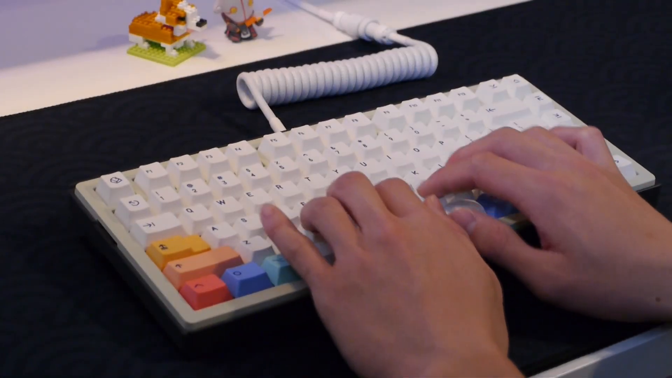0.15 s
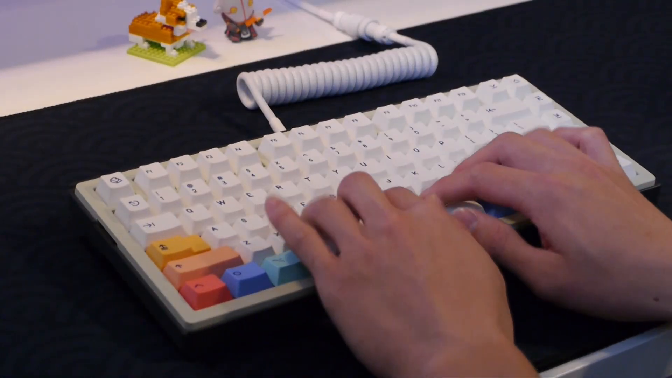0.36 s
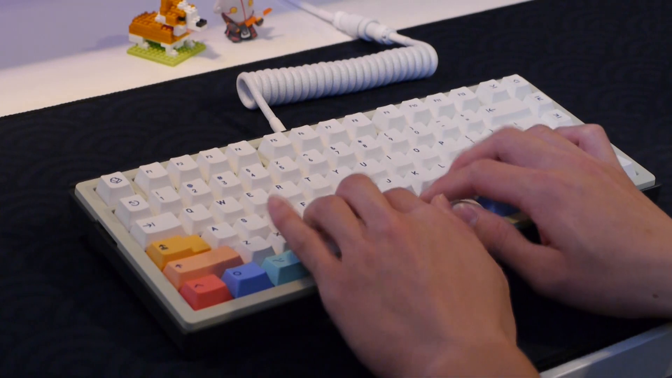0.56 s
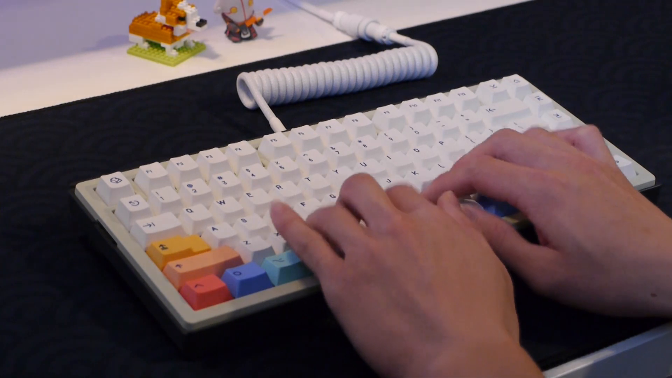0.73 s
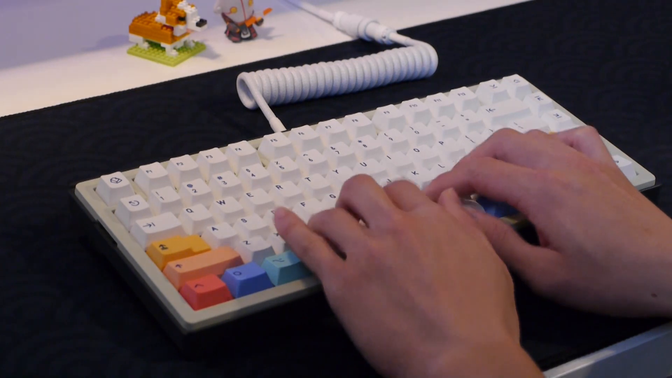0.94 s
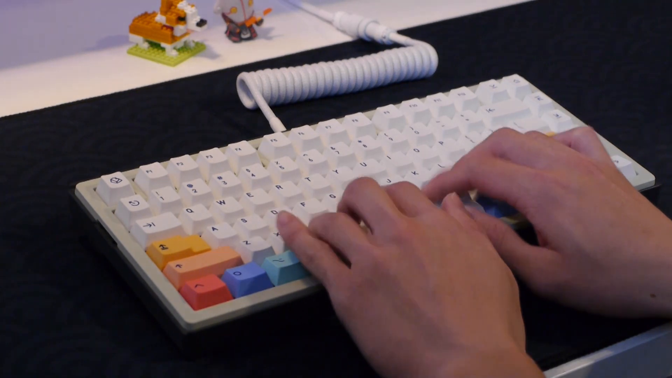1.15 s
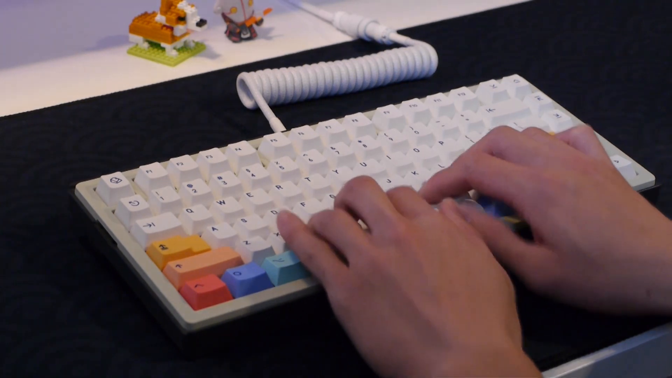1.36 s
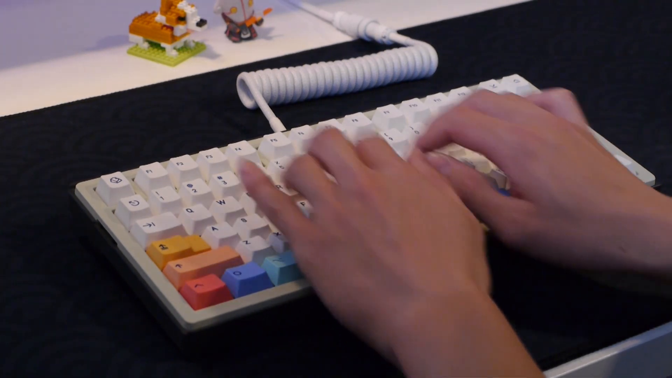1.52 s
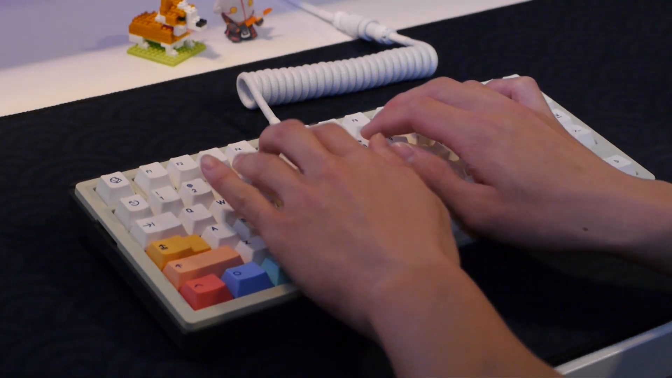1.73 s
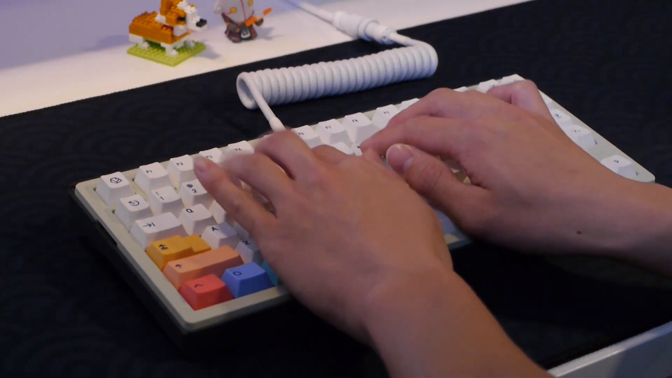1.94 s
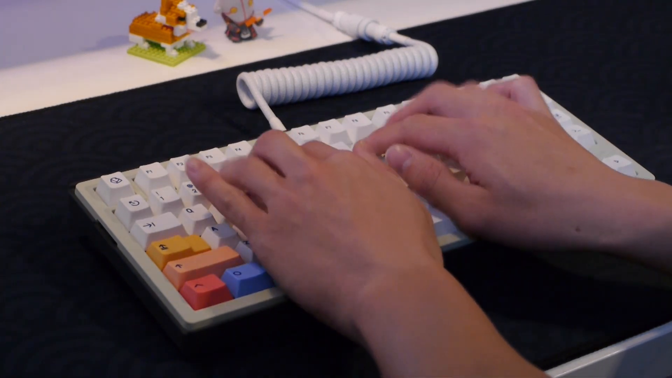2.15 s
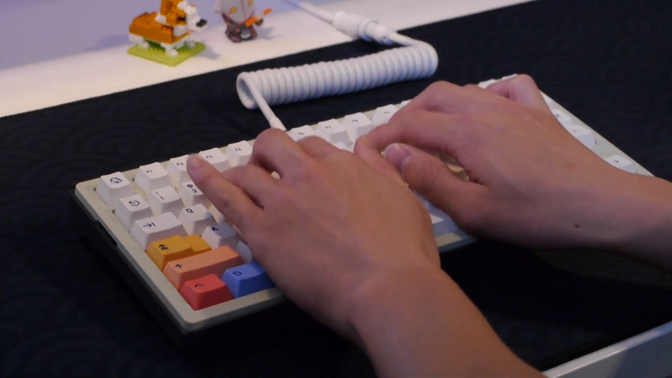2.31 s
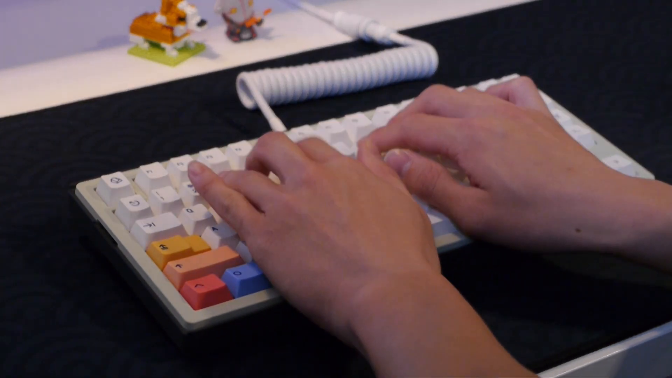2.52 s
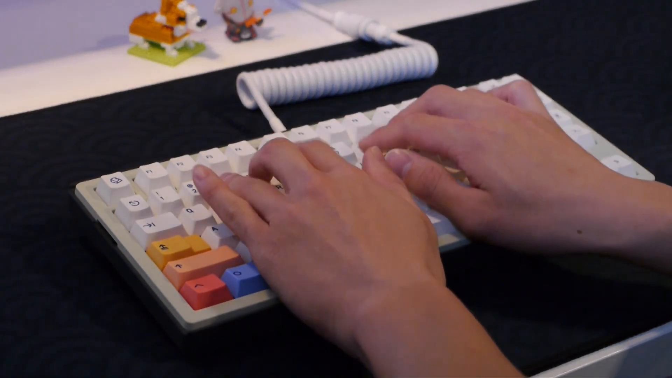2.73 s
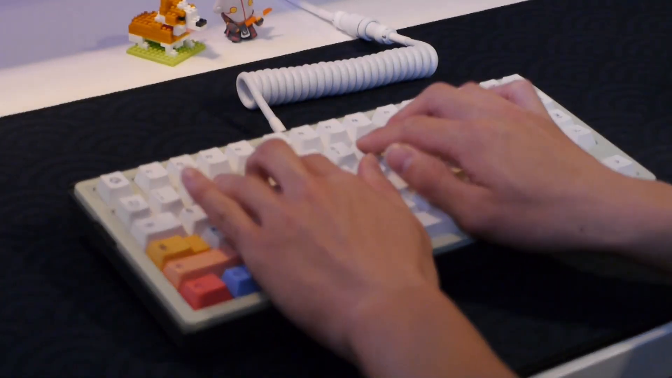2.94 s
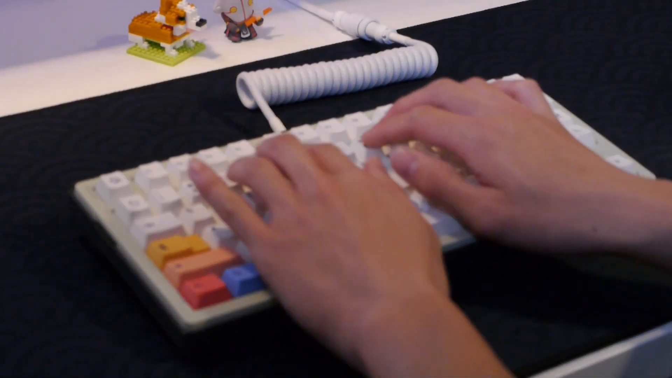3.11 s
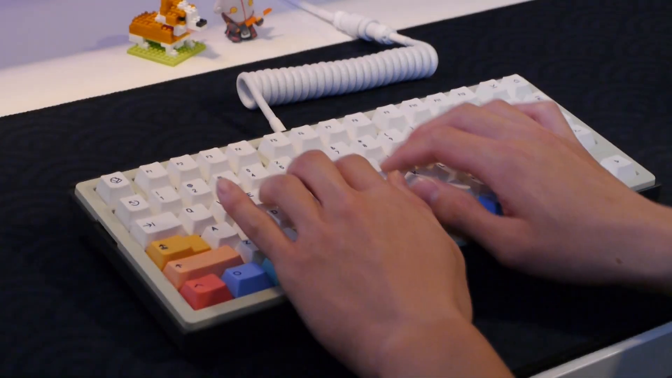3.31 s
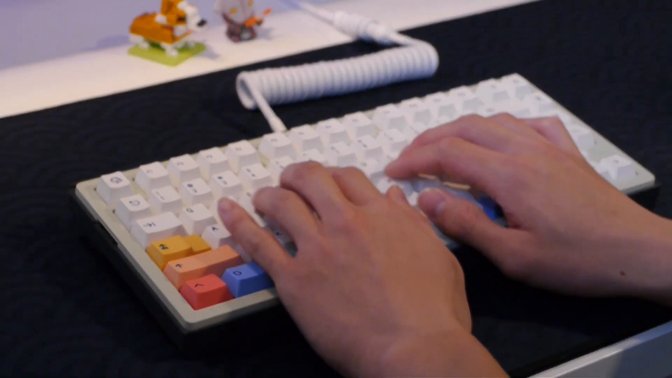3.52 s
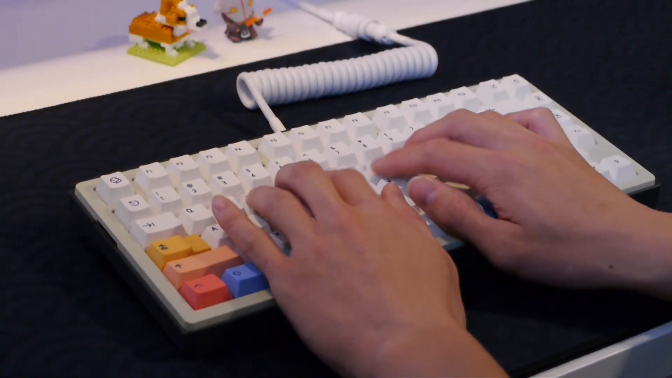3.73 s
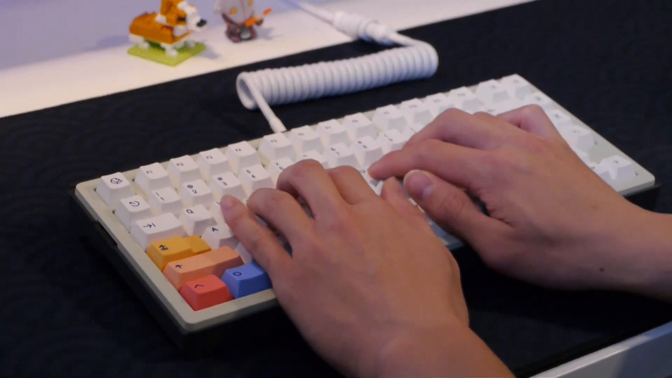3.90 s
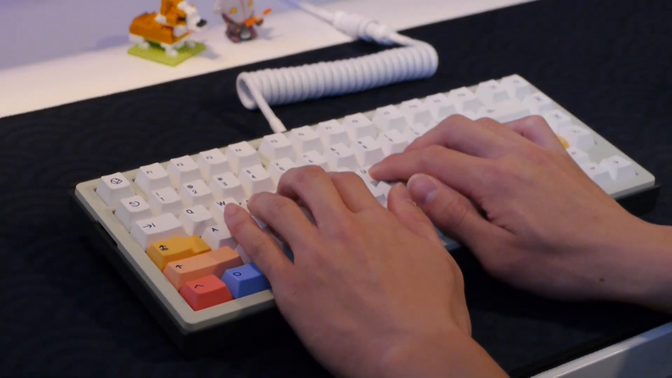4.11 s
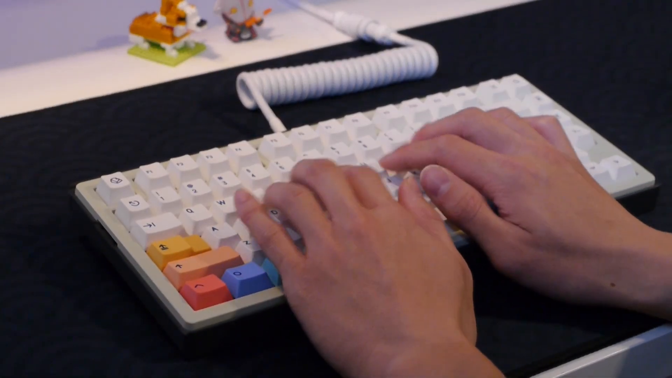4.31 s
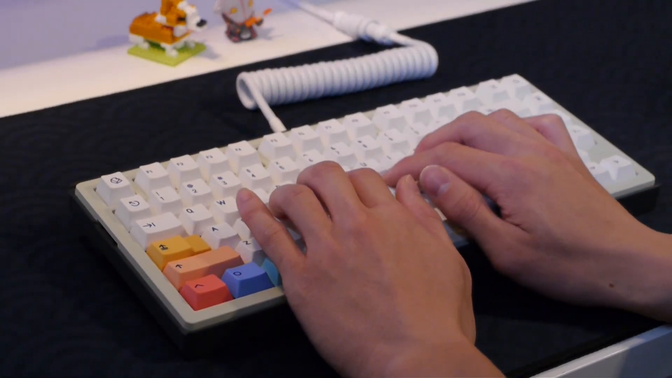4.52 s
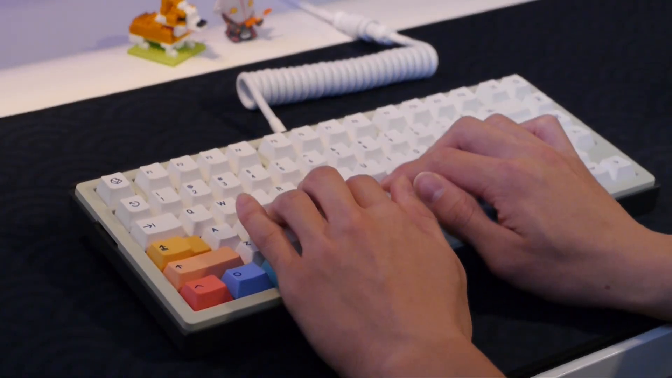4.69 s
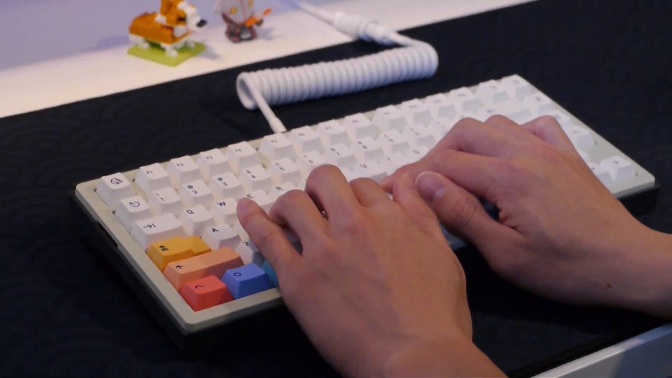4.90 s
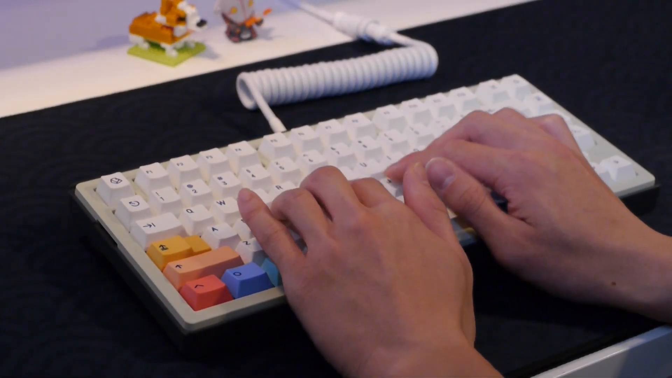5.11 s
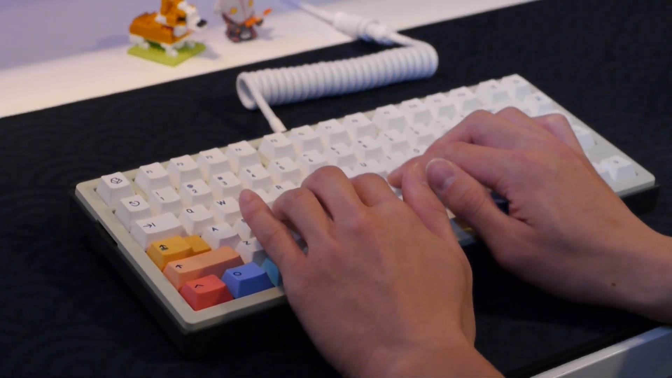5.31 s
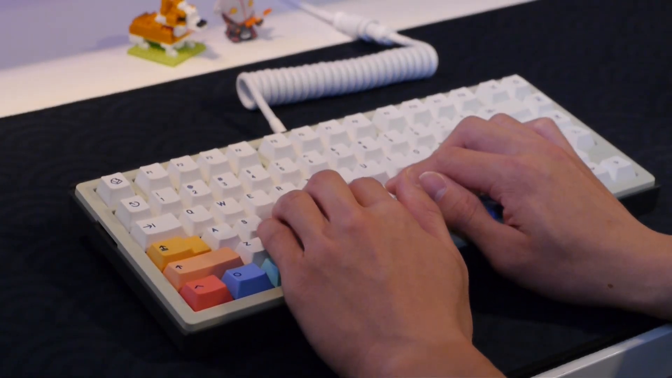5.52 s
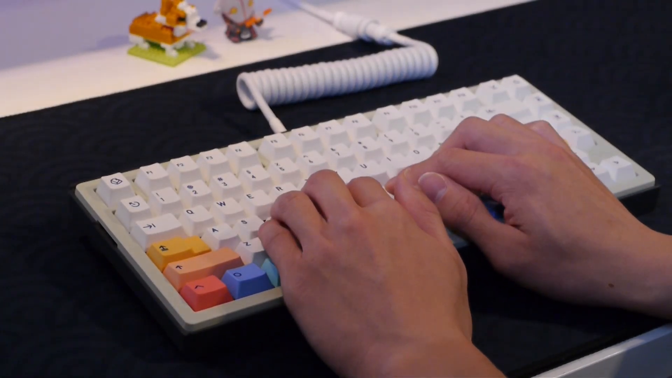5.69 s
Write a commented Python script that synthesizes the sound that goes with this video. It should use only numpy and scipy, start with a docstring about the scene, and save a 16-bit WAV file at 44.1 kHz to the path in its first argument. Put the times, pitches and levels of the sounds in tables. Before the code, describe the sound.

Close, cushioned plastic clacks come from a mechanical keyboard: a quick run of typing, a short break, another slightly stronger run, then five spaced key presses. Each key knocks and ticks lightly as it lands or springs back, with a short small-room tail. Fingertips faintly brush the keycaps, and a fan hums quietly throughout. The stereo microphone is at the desk, with the keyboard a little to its left.

```python
"""Typing at a desk in a small room

Two fast runs on a damped mechanical keyboard, a little left of the stereo microphone, then five slow
presses. Each key landing or springing back gives a short plastic knock and a faint tick, and rings
the case. The desk and nearby surfaces throw it back within about 6 ms, ahead of a short room tail.
Fingertips brush the keycaps; fan noise and a low hum lie underneath."""
import sys
import numpy as np
from scipy import signal
from scipy.fft import rfft, irfft
from scipy.io import wavfile
from scipy.ndimage import uniform_filter1d

SR = 44100
rng = np.random.default_rng(int(sys.argv[2]) if len(sys.argv) > 2 else 0)


def file_out(sig):
    """Save sig as 16-bit WAV at sys.argv[1]."""
    # one column per channel
    cols = np.atleast_2d(sig).T
    # limit, then scale
    lim = np.clip(cols, -1, 1)
    pcm = np.round(lim * 32767).astype(np.int16)
    wavfile.write(sys.argv[1], SR, pcm)


N = 253575
IMPACT_SAMPLES, ATTACK_SAMPLES = 4096, 360  # one impact, and its first 8 ms


def gain_of(db):
    """Decibels to an amplitude factor."""
    return 10 ** (np.asarray(db) / 20)


def unit(x):
    """Scales each channel to an energy of one."""
    return x / np.sqrt(np.sum(x ** 2, -1, keepdims=True) + 1e-20)


def curve(points, hz):
    """Reads a table along a logarithmic frequency axis."""
    table_hz, value = np.transpose(points)
    return np.interp(np.log(hz + 1), np.log(table_hz + 1), value)


def pan(left_db):
    """Channel gains for a source left_db louder on the microphone's left side."""
    return gain_of(np.array([[.5], [-.5]]) * left_db)


# Fan and room air at the desk: (frequency [Hz], relative density [dB])
AIR_SPECTRUM = [(25, -31), (48, -27), (62, -10.5), (105, -9), (130, -1.5), (185, 0.5), (250, -2), (400, -1),
                (840, -3), (1000, -7), (2200, -16), (4000, -21.5), (10000, -22), (13000, -27), (16000, -33)]
# How alike that air is on the microphone's two sides: (frequency [Hz], correlation [0-1])
AIR_CORRELATION = [(60, 0.83), (170, 0.99), (350, 0.81), (700, 0.37), (1500, 0.077), (4000, 0.043),
                   (12000, 0.051)]
# The fan's motor tones: (frequency [Hz], level [dB])
MOTOR_TONES = [(70, -72), (204.6, -71.5), (473.7, -79.5), (651.4, -67.5), (748.3, -68)]

def fan(air_db):
    """Steady air noise, nearly mono in the bass, with faint wavering motor tones."""
    hz, t = np.fft.rfftfreq(N, 1 / SR), np.arange(N) / SR
    left, other = rfft(rng.standard_normal((2, N)))
    correlation = curve(AIR_CORRELATION, hz)
    right = correlation * left + np.sqrt(1 - correlation ** 2) * other
    air = irfft(np.array([left, right]) * gain_of(curve(AIR_SPECTRUM, hz)), N)
    out = gain_of(air_db) * unit(air) * np.sqrt(N)
    knots = np.linspace(0, t[-1], num=24)
    for tone_hz, db in MOTOR_TONES:
        waver = np.interp(t, knots, 0.25 * rng.standard_normal(len(knots)))
        phase = 2 * np.pi * (tone_hz * t + rng.random()) + waver
        out += np.sqrt(2) * gain_of(db) * np.sin(phase)
    return out * pan(left_db=0.39)


# The small room around the desk: (frequency [Hz], time to fall 60 dB [s])
ROOM_DECAY = [(150, 0.6), (600, 0.49), (1500, 0.29), (3000, 0.23), (9000, 0.3), (15000, 0.12)]

def room(source, correlation, build_s):
    """A short diffuse room tail whose colour drifts, cycling through three tails once a second."""
    t, out = np.arange(SR // 2) / SR, np.zeros((2, N))
    onset = np.clip(t / build_s - .5, 0, 1)
    for k in range(3):
        noise = rng.standard_normal((3, len(t)))
        stereo = np.sqrt(correlation) * noise[2] + np.sqrt(1 - correlation) * noise[:2]
        hz, frame_s, bands = signal.stft(stereo, SR, nperseg=256)
        decay = gain_of(-60 * frame_s / curve(ROOM_DECAY, hz)[:, None])
        tail = signal.istft(bands * decay, SR, nperseg=256)[1][:, :len(t)]
        crossfade = np.cos(2 * np.pi * (np.arange(N) / SR + k / 3)) * np.sqrt(2 / 3)
        out += signal.fftconvolve(source * crossfade, unit(tail * onset), axes=1)[:, :N]
    return out


# Skin brushing plastic: (frequency [Hz], relative density [dB])
SKIN_SPECTRUM = [(700, -16), (1500, -0.5), (2400, -0.5), (3800, -16), (5500, -6.5), (8500, -10.5),
                 (13000, -30), (16000, -24)]
# First the faint fading tail of a key struck just before the start, then fingertip slides:
# (middle time [s], length [s], level [dB])
FAINT_SWELLS = [(0.028, 0.22, -60), (.85, 1.9, -66), (3.57, 0.73, -64), (3.887, .05, -63),
                (4.1, 0.34, -63.5), (5.08, 0.2, -65), (5.55, .2, -64.5)]

def fingertips(grain_db, resting_db):
    """Skin sticks and slips on the keycaps in faint swells; the same noise gives the opening key tail."""
    hz, t = np.fft.rfftfreq(N, 1 / SR), np.arange(N) / SR
    grip = unit(uniform_filter1d(rng.standard_normal(N), size=500)) * np.sqrt(N)
    slips = (rng.standard_normal(N) + rng.standard_normal((2, N))) * gain_of(grain_db * grip)
    brush = unit(irfft(rfft(slips) * gain_of(curve(SKIN_SPECTRUM, hz)), N)) * np.sqrt(N)
    power = gain_of(resting_db) ** 2  # fingers shifting where they rest
    for middle_s, length_s, db in FAINT_SWELLS:
        swell = np.cos(np.pi * np.clip((t - middle_s) / length_s, -.5, .5))
        power += (gain_of(db) * swell) ** 2
    return brush * np.sqrt(power)


# Desk and nearby surfaces: (delay [ms], knock left [gain], knock right [gain], tick [gain])
DESK_ECHOES = [(1.13, .37, .14, .6), (2.52, .22, .08, .16), (3.85, .11, .06, .12), (4.95, .4, .3, 1.2),
               (5.37, .33, .12, .72)]

def desk_paths(direct_db, gain_columns, spread_ms):
    """The straight path to the microphone and early echoes, whose delays shift with the key's place."""
    echoes = np.transpose(DESK_ECHOES)
    shift = rng.standard_normal() + .5 * rng.standard_normal(len(DESK_ECHOES))
    delay_ms = echoes[0] + spread_ms * shift
    taps = np.zeros((2, IMPACT_SAMPLES))
    taps[:, 0] = gain_of(direct_db)
    taps[:, np.round(delay_ms * SR / 1000).astype(int)] += echoes[gain_columns]
    return taps


def rattle(t60, correlation):
    """A dying spray of tiny contacts and scatter among the keycaps, partly alike in both channels."""
    t = np.arange(IMPACT_SAMPLES) / SR
    shared, apart = rng.standard_normal(len(t)), rng.standard_normal((2, len(t)))
    noise = np.sqrt(correlation) * shared + np.sqrt(1 - correlation) * apart
    return unit(noise * gain_of(-60 * t / t60) * np.clip(t / 0.0018, 0, 1))


# Modes of plate and case: (frequency [Hz], relative level [dB], time to fall 60 dB [s])
CASE_MODES = [(807, 3.5, 0.065), (942, 12.5, 0.26), (1165, 15, 0.11), (1555, 38.5, 0.029),
              (1828, -27, 0.14), (1890, -12, 0.085), (2240, 0, 0.12), (2450, 12, 0.26), (3046, 4, .055)]

def case_ring(detune, uneven_db):
    """Plate and case ring on; each key drives their modes with its own strengths."""
    hz, db, t60 = np.transpose(CASE_MODES)[:, :, None]
    t = np.arange(IMPACT_SAMPLES) / SR
    shift, strength = rng.standard_normal((2, len(CASE_MODES), 1))
    envelopes = gain_of(db + uneven_db * strength - 60 * t / t60)
    modes = envelopes * np.cos(2 * np.pi * hz * (1 + detune * shift) * t)
    return unit(modes.sum(0))


def pulse(parts, peak_hz=2000, peak_db=0, half_width_hz=100):
    """The shortest causal pulse that holds the (spectrum, dB) parts, with one optional resonance."""
    hz = abs(np.fft.fftfreq(IMPACT_SAMPLES, 1 / SR))
    extra_power = gain_of(max(peak_db, 0)) ** 2 - 1
    resonance = np.sqrt(1 + extra_power / (1 + ((hz - peak_hz) / half_width_hz) ** 2))
    power = sum((gain_of(db) * unit(resonance * gain_of(curve(shape, hz)))) ** 2 for shape, db in parts)
    log_gain = np.log(power * IMPACT_SAMPLES * ATTACK_SAMPLES + 1e-14) / 2
    minimum_phase = np.exp(np.conj(signal.hilbert(log_gain)))
    return np.fft.ifft(minimum_phase).real[None, :IMPACT_SAMPLES // 2]


def attack_level(sound, db):
    """Gives the first 8 ms of each channel the level db."""
    return sound * gain_of(db) / np.sqrt(np.mean(sound[:, :ATTACK_SAMPLES] ** 2, axis=1, keepdims=True))


# The keycap's thin tick: (frequency [Hz], relative density [dB])
TICK_SPECTRUM = [(1500, -66), (3300, 11.5), (4700, 4), (6300, 5), (9000, 9), (10300, 5.5), (11800, 8),
                 (13500, -1.5), (16000, -46)]

def tick(tick_db, ping_hz):
    """The keycap snaps with a brief chatter, thrown back strongly by the surfaces nearby."""
    parts = [(TICK_SPECTRUM, 0)]
    snap = gain_of(4) * rattle(t60=.0045, correlation=.4)
    snap[:, 0] += 1
    paths = desk_paths(direct_db=0, gain_columns=3, spread_ms=.04)
    early = unit(signal.fftconvolve(paths, snap, axes=1)[:, :IMPACT_SAMPLES])
    late = gain_of(-3) * rattle(t60=.12, correlation=.3)
    ping = pulse(parts, ping_hz, peak_db=6, half_width_hz=500)
    sound = signal.fftconvolve(early, ping, axes=1) + signal.fftconvolve(late, pulse(parts), axes=1)
    return attack_level(sound, tick_db)


# The soft, low part of a knock and its hard part: (frequency [Hz], relative density [dB])
THOCK_SPECTRUM = [(30, -45), (110, -29), (250, -11.5), (500, -4.5), (690, -3.5), (750, -1.5), (1250, 1.5),
                  (1500, -7), (2200, -13), (4000, -60)]
CLACK_SPECTRUM = [(500, -49), (1100, -4), (1550, 0), (2100, 6), (2800, 4), (3250, -2), (3900, -13),
                  (6000, -14), (12000, -28)]

def knock(strength_db, depth_db, cap_hz, cap_db, direct_db):
    """The stem hits its housing: one plastic pulse with its echoes, then rattle and the case's ring."""
    clack_db = strength_db - 10 * np.log10(1 + gain_of(depth_db) ** 2)  # the two parts share the power
    parts = [(THOCK_SPECTRUM, clack_db + depth_db), (CLACK_SPECTRUM, clack_db)]
    early = desk_paths(direct_db, gain_columns=[1, 2], spread_ms=0.057)
    early += gain_of(-6.5) * rattle(t60=.04, correlation=.75)
    late = gain_of(-7) * rattle(t60=.15, correlation=.65)
    late += gain_of(-17) * case_ring(detune=.004, uneven_db=2)
    # the struck keycap colours only the start; the rest of the board answers with its own colour
    cap = pulse(parts, cap_hz, cap_db, half_width_hz=110)
    sound = signal.fftconvolve(early, cap, axes=1) + signal.fftconvolve(late, pulse(parts), axes=1)
    return attack_level(-sound, strength_db)


def plate_flex(sound, hz=2100, width_hz=870):
    """The flexing plate holds one band back, spreading the first peak without changing the spectrum."""
    band = signal.iirpeak(hz, hz / width_hz, fs=SR)
    return sound - 2 * signal.lfilter(*band, sound)


# How the hands play the lower rows, the upper rows and the slow presses:
# (start [s], base keycap resonance [dB], knock's straight path [dB], tick's ping [Hz])
HAND_PASSAGES = [(0, 5.5, -5.5, 9900), (1.7, 4, -3.5, 8200), (3.5, 5, -7, 9800)]

def keystroke(time_s, strength_db, depth_db, tick_db, cap_hz):
    """One key meets its stop, a little left of the microphone: a knock with the tick on top."""
    passage = sum(time_s >= row[0] for row in HAND_PASSAGES[1:])
    _, cap_db, direct_db, ping_hz = HAND_PASSAGES[passage]
    # a cushioned stroke (deep, with little tick) lets the keycap's resonance stand out more
    cap_db += 0.43 * depth_db - 0.32 * tick_db
    # it also stays longer in contact, which dulls the top of the knock
    contact_lowpass = signal.butter(2, 9100 * 2 ** (0.0636 * tick_db), fs=SR)
    body = knock(strength_db, depth_db, cap_hz, cap_db, direct_db)
    body = plate_flex(signal.lfilter(*contact_lowpass, body))
    ping_octaves, left_db = rng.normal(0, 0.081), rng.normal(2, 1)  # vary from key to key
    return pan(left_db) * (body + tick(strength_db + tick_db, ping_hz * 2 ** ping_octaves))


# Keys landing or springing back: (time [s], strength [dB], depth: thock over clack [dB],
# tick over strength [dB], keycap resonance [Hz])
KEY_STROKES = [(0.2354, -39.5, -9, -4.5, 2370), (.242, -32, -6, -11, 2690), (.2866, -43, -21, -4, 1670),
               (.2905, -30, -6, -11.5, 1560), (.3228, -45, 1, -11, 1940), (.3476, -43, -5, -11, 1540),
               (.3693, -46, 4, -16, 1560), (.3809, -40, 0.5, -19, 1040), (.4131, -44.5, 5, -17, 1610),
               (.4233, -47, -6, -21, 1020), (.4447, -35.5, -8, -3.5, 1590),
               (.4586, -27.5, -12.5, -12, 2140), (0.4743, -44, -10, -23, 2040),
               (.5131, -35, -4.5, -15, 1560), (.5396, -40, -7, -11, 2000), (.572, -39, -3, -10.5, 1560),
               (.6014, -40.5, 2, -22, 1520), (.6432, -35, -5, -7.5, 1560), (.672, -32.5, -6.5, -12, 1530),
               (0.6857, -37.5, -3, -30, 1980), (0.7105, -42, -3, -12, 2030),
               (.744, -32.5, -18, -15.5, 1980), (.7942, -34.5, -4, -10, 1560), (.8224, -43.5, 6, -19, 1010),
               (0.8577, -43, -9, -14, 1570), (0.8647, -35, -4, -6.5, 1570), (.901, -33.5, -2, -13, 1050),
               (.925, -40, -1, -15, 990), (0.9716, -36.5, -19, -17, 2050), (1.0165, -35, 0, -13, 1560),
               (1.0512, -41, -3, -24, 1550), (1.0652, -38, 2, -19, 1580), (1.0899, -34, -1.5, -8.5, 1540),
               (1.1198, -31.5, -2, -12.5, 1530), (1.1837, -36.5, -10.5, -20.5, 2060),
               (1.2418, -36.5, -0.5, -18, 1600), (1.2664, -43.5, 5, -15, 1080),
               (1.3028, -33.5, -6, -9, 1560), (1.3231, -31, -2.5, -15.5, 1520),
               (1.3716, -39, -23, -9, 2010), (1.3818, -33.5, -6.5, -12.5, 1600),
               (1.4346, -38.5, 3, -25, 1570), (1.4432, -40, -3, -18, 1010), (1.4818, -42.5, -4, -18, 1990),
               (1.4949, -38, -1, -21, 865), (1.867, -30.5, -1.5, -18, 1570), (1.8835, -28.5, -8, -13, 2900),
               (1.9323, -27, -10, -15.5, 2360), (1.9519, -31.5, 0, -14, 2000),
               (1.9584, -35.5, 3, -18, 1240), (1.985, -34.5, 1, -22, 1990),
               (1.9949, -39.5, -2, -13.5, 1980), (2.0439, -34.5, -6, -14, 1950),
               (2.046, -29, -3.5, -16.5, 2200), (2.0857, -33, -5, -12, 2100), (2.1018, -37, -5, -32, 1600),
               (2.1386, -31, -5.5, -14, 2220), (2.1642, -30.5, -4, -23, 1970),
               (2.1732, -33, 0.5, -23, 1340), (2.2094, -34.5, -1, -26, 2000),
               (2.2431, -32.5, -3, -14, 2120), (2.251, -30, -4, -20.5, 2000), (2.2804, -38.5, 3, -25, 860),
               (2.2986, -39, -5, -19, 1590), (2.3046, -35.5, -2, -30, 1680), (2.3123, -34, -2, -16, 2060),
               (2.339, -29.5, -7.5, -12.5, 2270), (2.3753, -30.5, -3, -21.5, 2050),
               (2.4395, -32, -3, -15, 2090), (2.4691, -32, -0.5, -16, 1940), (2.4966, -41, 0, -27, 1650),
               (2.526, -34.5, -7, -15.5, 2250), (2.5354, -34, -4, -18, 2010), (2.585, -31, -4, -21.5, 2170),
               (2.6086, -45, 8, -24, 850), (2.6344, -37.5, 1, -12.5, 1580), (2.6662, -36, -6, -26, 1150),
               (2.6774, -28.5, -2.5, -18, 1990), (2.692, -41, -1, -26, 910), (2.7338, -35, -2, -18, 1590),
               (2.741, -31, -8.5, -13.5, 2120), (2.7697, -39, 7, -12, 1510), (2.7928, -38, -4, -26, 2000),
               (2.8032, -33.5, 2, -26, 1350), (2.8271, -52, 8, 9, 1500), (2.8477, -31, -2, -18, 1550),
               (2.8738, -41, 15, -31, 854), (2.8792, -25.5, -13, -18, 1430), (2.8867, -32, -14, -26, 2330),
               (2.9342, -29.5, -7.5, -13, 1810), (2.9725, -31.5, -7.5, -23, 1990),
               (3.0163, -42, 9, -22, 880), (3.0602, -43, -4, -34, 1600), (3.0731, -47, 7, -25, 850),
               (3.0815, -40.5, -2, -31, 2070), (3.094, -44, 1.5, -23, 835), (3.7334, -43.5, -5, -16, 2100),
               (3.7606, -39.5, -17, -15, 2100), (3.7734, -37, -7, -28, 2240), (3.7801, -40, -10, -17, 2480),
               (4.2678, -41.5, 1, -19, 900), (4.2758, -36, 4, -20, 1630), (4.2848, -35.5, -0.5, -29, 2020),
               (4.592, -46, 5, -24, 1170), (4.6193, -45, 14, -20, 1200), (4.6292, -36, -2, -14, 2220),
               (4.6373, -33, -13, -17, 2030), (4.6431, -37.5, -22, -21, 2020), (4.682, -54, -15, -21, 2100),
               (5.1091, -40, 8, -25, 1510), (5.117, -40, -2, -24, 1850), (5.13, -41, 4, -22, 1580),
               (5.4064, -36.5, -6.5, -14.5, 1500), (5.4209, -33, -8, -21, 1580)]
# Where the hands move fast: (start [s], end [s])
FAST_RUNS = [(.3, 1.5), (1.9, 3.1)]

def typing(touches_per_run):
    """The keystrokes, and chance light touches on neighbouring keys during the fast runs."""
    out, strokes = np.zeros((2, N)), list(KEY_STROKES)
    strength_db, depth_db, tick_db = -47.5, 8, -10  # a light touch
    for start_s, end_s in FAST_RUNS:
        for _ in range(touches_per_run):
            time_s, cap_hz = rng.uniform(start_s, end_s), rng.uniform(850, 1700)
            strokes.append((time_s, strength_db, depth_db, tick_db, cap_hz))
    for time_s, *stroke in strokes:
        start = round(time_s * SR)
        sound = keystroke(time_s, *stroke)[:, :N - start]
        out[:, start:start + sound.shape[1]] += sound
    return out


def scene():
    """What reaches the microphone at the desk: the keyboard, its room and the fan."""
    keys = typing(touches_per_run=5) + fingertips(grain_db=2.0, resting_db=-71)
    return keys + gain_of(-9.5) * room(keys, correlation=0.63, build_s=0.005) + fan(air_db=-52)


def record(dry):
    """The recorder cuts off the treble above 16.1 kHz."""
    lowpass = signal.firwin(511, 16100, window=("kaiser", 9), fs=SR)
    return signal.oaconvolve(dry, lowpass[None], "same")


dry = scene()
out = record(dry)
file_out(out)
```